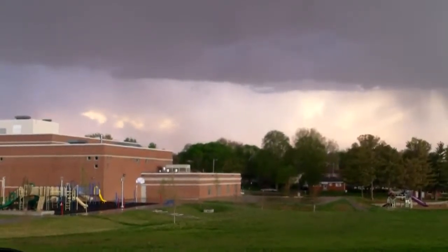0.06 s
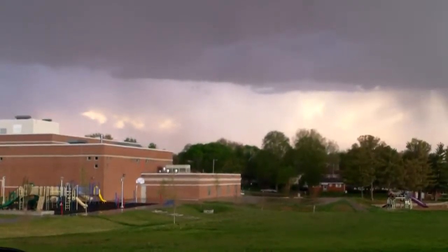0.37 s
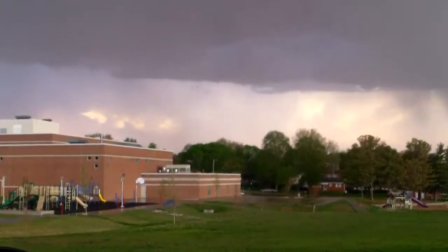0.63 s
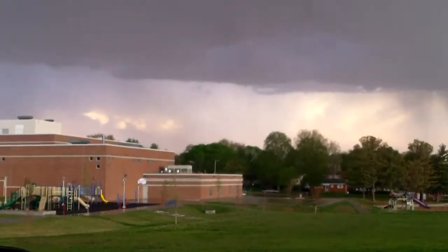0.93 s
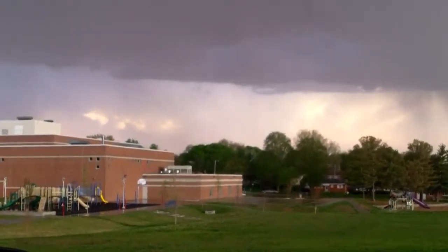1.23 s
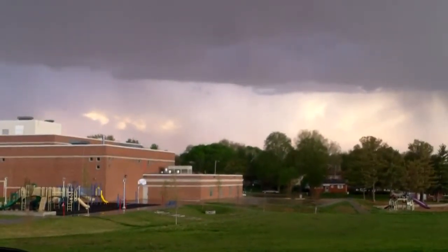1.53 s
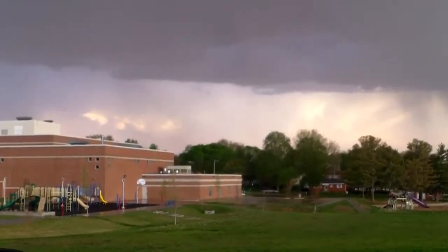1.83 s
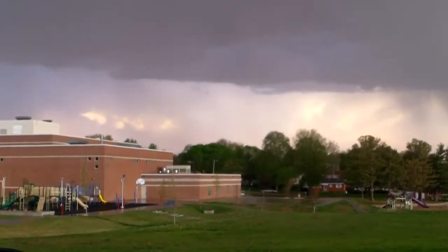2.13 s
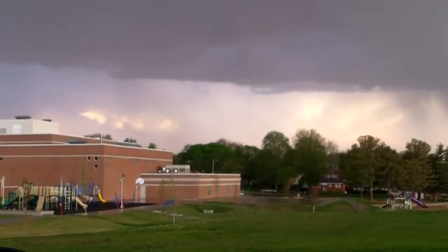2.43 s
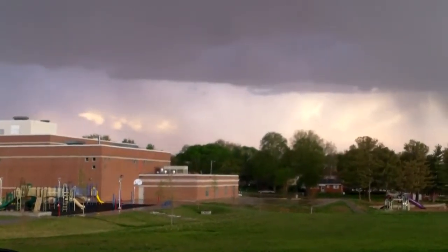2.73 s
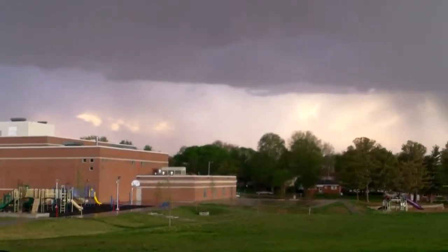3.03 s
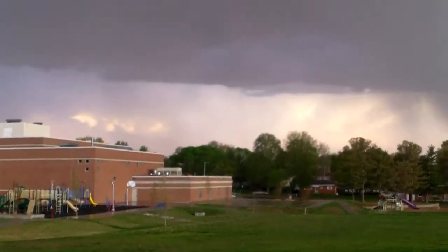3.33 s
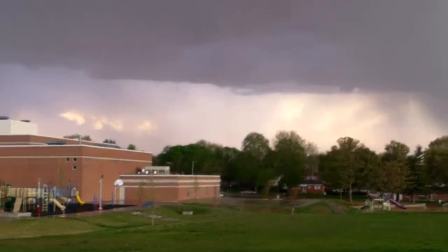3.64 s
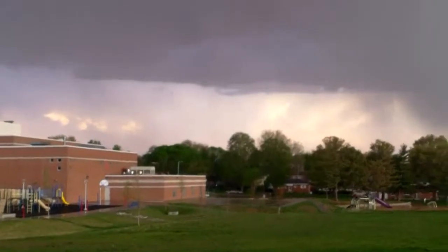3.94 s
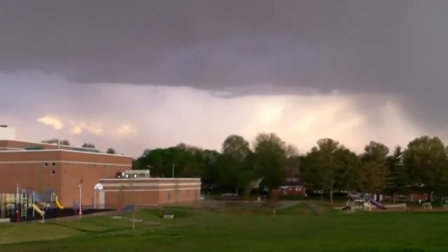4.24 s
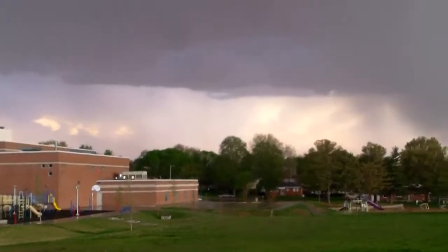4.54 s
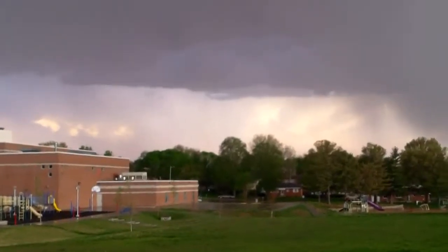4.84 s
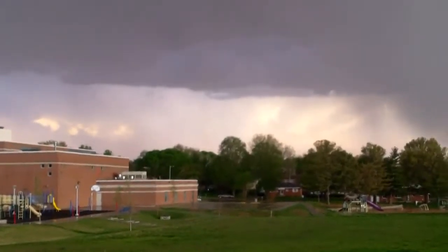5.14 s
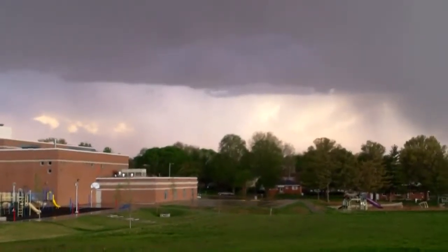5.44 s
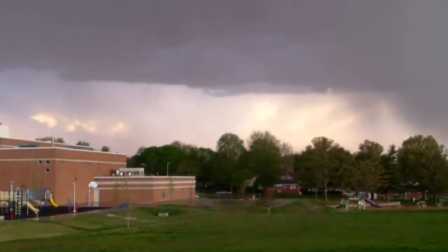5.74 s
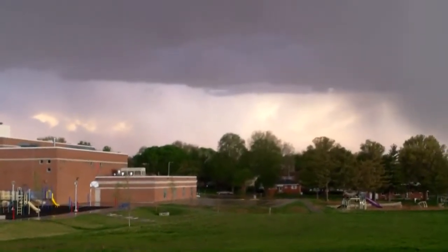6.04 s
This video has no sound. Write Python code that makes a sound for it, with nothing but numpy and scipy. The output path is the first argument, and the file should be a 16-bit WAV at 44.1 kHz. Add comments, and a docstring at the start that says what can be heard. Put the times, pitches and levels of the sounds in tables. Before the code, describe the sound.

Distant thunder rolls and slowly fades over light rain, with scattered drops ticking and splatting on a parked vehicle.

```python
"""Distant thunder, shock waves dulled by the air, rolls over light rain, heard inside a parked vehicle. Almost
at once single peals stand out of the roll, and drops splat on the bodywork or tick close by. Near 1 s the
thunder is heaviest and fine dry crackles fall on its loud peaks; a limiter catches the strongest peals and
ducks the rain for a moment. At 3.6 s comes the hardest tick. Then the roll slowly fades, the rain grows a
little, and a few knocks and soft bumps set the body panels ringing."""
import sys
import numpy as np
from scipy import signal
from scipy.fft import rfft, irfft, next_fast_len
from scipy.io import wavfile
from scipy.ndimage import uniform_filter1d

SR = 44100
rng = np.random.default_rng(int(sys.argv[2]) if len(sys.argv) > 2 else 0)


def persist_wave(psi):
    """Save psi, clipped to +-1, as 16-bit WAV."""
    counts = np.round(np.clip(psi, -1, 1) * 32767).astype(np.int16)
    wavfile.write(sys.argv[1], SR, np.atleast_2d(counts).T)


N = 276948
TIME = np.arange(N) / SR

# slow envelope of the thunder: time_s, level_db, depth_db (more rumble, less growl)
THUNDER_ROLL = [(0, -24, 0.5), (.3, -18, 3.5), (.58, -19.5, 2), (.92, -13, 1), (1.05, -18.5, 3),
                (1.2, -23, -0.5), (1.45, -20, 1.5), (1.95, -19.5, 1), (2.55, -21.5, 1), (2.75, -21, 1),
                (2.9, -18.5, 2.5), (3.1, -21, 1.5), (3.35, -21.5, 2.5), (3.7, -27.5, 1), (4.1, -25, 2),
                (4.4, -27, 3), (4.98, -26.5, 2.5), (5.3, -30, 3.5), (6.0, -31, 4.5), (6.28, -28.5, 1)]
# low, middle and high registers of the thunder: frequency_hz, gain_db
RUMBLE_SPECTRUM = [(5, -5.5), (14, 9), (26, -8.5), (40, 6), (50, 1), (63, -8), (80, -1), (100, -7.5),
                   (135, -44.5)]
BOOM_SPECTRUM = [(70, -17), (105, -3.5), (120, 2.5), (140, 0.5), (180, 0.5), (215, -3.5), (245, -9),
                 (290, -8.5), (420, -32.5)]
GROWL_SPECTRUM = [(190, -21.5), (260, -14.5), (295, 6.5), (335, 4.5), (400, -2.5), (540, -6), (740, -12.5),
                  (830, -12.5), (930, -19.5), (1110, -19), (1300, -38), (2200, -77), (4000, -57)]
# resonances and notches of the cabin: centre_hz, width_hz, gain_db
CABIN_RESONANCES = [(174.7, 15.3, 1), (234, 12, -4), (358, 13.6, -3), (542, 26, 2.5), (661, 16, 2.5),
                    (775, 22, -4), (798, 30, -0.5)]
# nearly steady envelope of the rain: time_s, level_db
RAIN_ENVELOPE = [(0, -47.5), (.3, -49.5), (.75, -47), (1.2, -48), (2, -47.5), (2.5, -47.5), (3.1, -48),
                 (3.7, -49.5), (4.1, -46), (6.28, -45.5)]
# wash of the rain outside: frequency_hz, gain_db
RAIN_SPECTRUM = [(200, -4.5), (700, 10.5), (1300, 8.5), (2200, 4.5), (3500, -1), (6500, -6.5),
                 (10000, -7.5), (12000, -11), (15500, -10)]
# single peals of thunder: centre_s, peak_db, pitch_hz, half_length_s
THUNDER_PEALS = [(0.049, -2, 40, 0.019), (0.211, -20.5, 470, 0.034), (0.276, -3.5, 62, 0.015),
                 (.313, -20.5, 512, 0.067), (.328, -5, 170, 0.021), (.4, -16, 270, 0.039),
                 (.411, -3, 182, .024), (.705, -14, 430, 0.032), (.715, -1.5, 84.5, 0.026),
                 (.795, 0, 183, 0.032), (.887, -0.5, 57, 0.05), (.935, 0, 106, 0.015),
                 (0.967, 3, 30.4, 0.039), (1.009, -1, 74, 0.023), (1.195, -1.5, 60, 0.041),
                 (1.223, -3.5, 30.3, 0.15), (1.612, -13.5, 255, 0.031), (1.79, -14, 193, 0.078),
                 (1.879, -14, 288, 0.066), (1.961, -14, 337, .05), (1.988, -9, 72.7, 0.053),
                 (2.084, -16, 304, 0.063), (2.16, -6, 155, 0.034), (2.39, -11, 100, 0.034),
                 (2.423, -6, 149, 0.034), (2.452, -17.5, 340, .07), (2.494, -9.5, 191, .047),
                 (2.619, -17.5, 312, 0.0206), (2.68, -17.5, 520, 0.021), (2.685, -0.5, 151, 0.024),
                 (2.717, -1, 173, 0.016), (2.84, -11.5, 183, 0.058), (2.909, -10.5, 315, 0.04),
                 (2.916, -25, 537, 0.075), (2.965, -4, 188, 0.0094), (3.015, -5.5, 38.6, 0.041),
                 (3.1, -18, 167, 0.12), (3.24, -25.5, 474, 0.076), (3.257, -9.5, 88, 0.031),
                 (3.38, -12, 114.4, 0.047), (3.913, -16.5, 230, 0.06), (4.135, -17.5, 310, 0.057),
                 (4.14, -14.5, 98, 0.065), (4.17, -21, 191, .12), (4.512, -17.5, 110, 0.14),
                 (4.86, -10, 137.5, 0.0075), (4.961, -13, 117, 0.067), (5.07, -17.5, 123, 0.078),
                 (5.62, -18.5, 116, 0.067)]
# dulling of a peal by distance: frequency_hz, gain_db
AIR_ABSORPTION = [(1000, 0.5), (2500, -16.5)]
# drops bursting on the bodywork: start_s, level_db, low_db, length_factor, top_db
SPLAT_DROPS = [(0.2357, -28.5, -1, 0.38, -5), (0.6592, -35.5, 0, 0.18, 12), (1.081, -35.5, 1, 0.43, 5),
               (1.187, -43, -2, 0.37, -3), (1.403, -41.5, -5, 0.28, 5), (1.464, -45, -4, 0.45, -2),
               (1.6073, -33, 9, 0.32, -1), (1.621, -34, 1, 0.34, 2), (1.771, -40, 1, 0.19, -3),
               (2.331, -36.5, -1, .2, 6), (2.6284, -32, -0.5, 0.43, 4), (2.916, -40, 1, 0.49, 12),
               (2.9331, -32, 0, .36, 8), (3.058, -52, -1.5, 0.38, 5), (3.126, -39.5, -3, 0.25, 2),
               (3.251, -38, 6, 0.41, 12), (3.342, -35.5, 2, 0.38, 7), (3.354, -35.5, -3, 0.39, 7),
               (3.494, -39.5, 1, 0.61, 2), (3.677, -36, 22, 0.15, 3), (3.789, -35.5, -2, 0.39, 2),
               (3.903, -33.5, -3.5, 0.48, 11), (3.9732, -33, -5, 0.44, 1), (4.0228, -38, -6, 0.33, 9),
               (4.0575, -36.5, -4, 0.33, 12), (4.1085, -33, -3.5, 0.48, 5), (4.357, -31.5, -12.5, 0.28, 6),
               (4.3856, -37.5, -1.5, 0.43, 9), (4.7123, -36, 7.5, 0.56, 13), (4.779, -39, 1, 0.47, 4),
               (4.803, -40, 1, 0.38, 8), (4.873, -31, 4, 0.31, 1), (5.073, -35.5, 1, 0.47, 2),
               (5.522, -34, -12, 0.52, 6), (5.5462, -38, 7, 0.43, 5), (5.811, -32, 3, 0.43, 1)]
# colour common to all splats: frequency_hz, gain_db
SPLAT_SPECTRUM = [(200, -15), (700, 7.5), (1500, 4.5), (3000, 0), (6000, -6), (9500, -13.5), (11500, -27.5),
                  (15500, -37)]
# drops on a hard surface close by: start_s, level_db, low_db, top_db, rattle_db, cabin_db, middle_db
TICK_DROPS = [(.319, -36, 6, 14, -12, -24, 0), (.3602, -37.5, -22, 12, -5, -18, -2),
              (.395, -40, -8, 12, -10, -18, 0), (.533, -43, -23, 2, -10, -12, -3),
              (.58, -41, -33, 2, -7, -4, -7), (0.8568, -16.5, 10, -0.5, -6, -19, -11),
              (1.006, -27.5, 6, 5, -2, -10, -2), (1.395, -44.5, -15, 0, -10, -22, -2),
              (1.546, -32, 18, -7, -6, -14, -1), (1.576, -39.5, -9, 5, -9.5, -26, 2),
              (1.882, -46, 11, -20, -10, -18, 0), (1.957, -44, -10, 7, -10, -20, 0),
              (2.089, -46, -12, 7, -7, -14, 0), (2.149, -42, -10, 5, -7, -10, -2),
              (2.3714, -27.5, 19, -9, -19, -16, -2), (2.4165, -37.5, 13, -12, -10, -4, -2),
              (2.848, -36, 17, 2, -6, -9.5, -6), (3.224, -40, 11, 2, -9, -9, 1),
              (3.2895, -43, 20, -10, -10, 0, 0), (3.467, -45, 13, -17, -8, 1, 0),
              (3.6241, -11, 4.5, 1.5, -9, -18, -2.5), (3.966, -33.5, 11, 3, -13, -7, -7),
              (4.2915, -41, 16, -20, -10, -10, 0), (4.3588, -30.5, -11, -11, -6, -7, 10),
              (4.4536, -43.5, -8, 4, -10, -24, 0), (4.608, -42, -8, 7, -10, -18, 0),
              (4.924, -41, -8, 6, -14, -26, 0), (4.9859, -25, 8, 0, -4, -18, -1),
              (5.0265, -42, -15, 14, -10, -22, 0), (5.127, -42, 0, -9, -6, -7, 4),
              (5.2993, -41.5, 19, 5, -10, -8, 6), (5.4125, -24.5, 12, -18, -21, -18, -2),
              (5.61, -41.5, -2, 9, -8, -15, 0), (5.654, -40, 19, 1, -6, -14, 0),
              (5.723, -46, -12, 16, -8, -16, 0), (5.935, -42.5, -6, 0, -5, -18, -8)]
# colour common to all ticks: frequency_hz, gain_db
TICK_SPECTRUM = [(400, -43), (1600, -5), (2250, 0.5), (2700, 3.5), (3400, 7.5), (4750, 10), (5500, 7),
                 (7000, 7.5), (8100, 4), (9200, 9), (11000, 0.5), (12400, 0), (13800, -4), (15000, -6.5)]
# fine clicks during the heaviest thunder: start_s, strength_db
CRACKLE_CLICKS = [(0.4146, -20), (.691, -22), (0.7132, -17.5), (0.7969, -19), (.8855, -28), (0.9, -15.5),
                  (.922, -14), (.9335, -16), (0.94, -25), (0.9464, -25.5), (0.967, -15), (0.986, -20),
                  (0.997, -35), (1.0273, -20), (1.038, -25), (1.049, -22), (1.718, -32), (1.872, -24.5),
                  (2.1728, -23.5), (2.682, -17.5), (2.714, -21.5), (2.967, -34), (3.014, -21)]
# colour of those clicks: frequency_hz, gain_db
CRACKLE_SPECTRUM = [(300, 45), (1500, 12.5), (4000, 2.5), (9000, -7), (15500, -5)]
# knocks and soft bumps on the body panels: start_s, level_db, softness_db_per_octave, length_factor
PANEL_BLOWS = [(3.680, -50, 5, 0.45), (4.721, -36, 19, 1.6), (4.881, -35, 11, 5.5), (5.55, -28.5, 1, .4),
               (5.819, -25, 9, 1.1), (6.154, -22, 35, 3.4)]
# modes of a panel, before each blow scales them: frequency_hz, level_db, t60_s
PANEL_MODES = [(292, -11, 0.019), (514, 4.5, 0.05), (698, -1.5, 0.094), (1060, 6, 0.026),
               (1500, -33, 0.021), (1730, -12, 0.017)]
# resonances and a notch of the microphone port: centre_hz, width_hz, gain_db
PORT_RESONANCES = [(4740, 250, 0), (6440, 150, 1), (6600, 1160, 5), (8010, 330, -4.5), (8950, 1100, 4)]


def amp(db):
    """Decibels to amplitude ratio."""
    return 10 ** (np.asarray(db) / 20)


def unit_rms(x):
    """Normalisation to an rms of 1."""
    return x / np.sqrt(np.mean(x ** 2) + 1e-20)


def gain_at(spectrum, hz):
    """Linear interpolation of a gain in dB over log frequency."""
    frequency_hz, gain_db = np.transpose(spectrum)
    return np.interp(np.log(hz + 1), np.log(frequency_hz), gain_db)


def coloured(x, db_at):
    """Minimum-phase filtering with gain db_at(hz): folding the cepstrum makes the response causal."""
    size = 2 * next_fast_len(len(x))
    gain = amp(db_at(np.fft.rfftfreq(size, 1 / SR)))
    cepstrum = irfft(np.log(gain), size)
    cepstrum[1:size // 2] *= 2
    cepstrum[size // 2 + 1:] = 0
    return irfft(rfft(x, size) * np.exp(rfft(cepstrum)), size)[:len(x)]


def local_rms(x, window_s):
    """Running rms under a triangular window."""
    size = max(int(window_s * SR), 1)
    power = uniform_filter1d(uniform_filter1d(x ** 2, size), size)
    return np.sqrt(abs(power) + 1e-14)


def impacts(per_s, spread_db):
    """A Poisson process: impulses at random moments, most small and a few large."""
    size = amp(spread_db * np.minimum(rng.exponential(1, N), 4))
    return size * rng.choice([-1, 1], N) * (rng.random(N) < per_s / SR)


def shock_waves(spectrum, level_db, per_s, spread_db, steady_s):
    """Superposition: shocks from many bends of the lightning channel, dulled by distance, form a roll."""
    top_hz, top_db = spectrum[-1]
    absorbed = list(spectrum) + [(2 * top_hz, top_db - 39.5)]  # the air absorbs everything higher
    waves = coloured(impacts(per_s, spread_db), lambda hz: gain_at(absorbed, hz))
    return waves / local_rms(waves, steady_s) * amp(level_db)


def thunder():
    """Amplitude modulation: one roll drives three registers, and its depth trades growl for rumble."""
    time_s, level_db, depth_db = np.transpose(THUNDER_ROLL)
    level, depth = np.interp(TIME, time_s, level_db), np.interp(TIME, time_s, depth_db)
    rumble = shock_waves(RUMBLE_SPECTRUM, level + depth, per_s=330, spread_db=3.0, steady_s=0.42)
    boom = shock_waves(BOOM_SPECTRUM, level, per_s=280, spread_db=0.0, steady_s=0.097)
    growl = shock_waves(GROWL_SPECTRUM, level - depth, per_s=800, spread_db=1.5, steady_s=0.42)
    return amp(3.0) * rumble + amp(-0.03) * boom + amp(-4.0) * growl


def cavity(x, resonances):
    """Resonance: an enclosed air space imposes bell-shaped peaks and notches on the spectrum."""
    return coloured(x, lambda hz: sum(gain_db * np.exp(-((hz - centre_hz) / width_hz) ** 2)
                                      for centre_hz, width_hz, gain_db in resonances))


def rain():
    """Shot noise: countless far drops blend into hiss, nearer ones patter, fine droplets prick on top."""
    t = np.arange(SR // 20) / SR
    spray = rng.standard_normal(len(t)) * (np.exp(-t / 0.0045) + 0.18 * np.exp(-t / 0.0023))
    patter = signal.oaconvolve(impacts(per_s=90, spread_db=2), spray)[:N]
    prick = np.diff(rng.standard_normal(len(t)) * np.exp(-t / 0.0005))
    droplets = signal.oaconvolve(impacts(per_s=60, spread_db=2), prick)[:N]
    hiss = rng.standard_normal(N)
    drops = hiss + amp(-5) * unit_rms(patter) + amp(-8) * unit_rms(droplets)
    wash = coloured(drops, lambda hz: gain_at(RAIN_SPECTRUM, hz))
    return unit_rms(wash) * amp(np.interp(TIME, *np.transpose(RAIN_ENVELOPE)))


def peals(slope_db_per_octave=22):
    """Wave packets: shock waves that arrive in a bunch make a brief swell around one pitch."""
    out, t = np.zeros(N), np.arange(-SR // 2, SR // 2) / SR
    for centre_s, peak_db, pitch_hz, half_length_s in THUNDER_PEALS:
        def band_db(hz):
            octaves_away = abs(np.log2((hz + 1) / pitch_hz))
            return gain_at(AIR_ABSORPTION, hz) - np.minimum(slope_db_per_octave * octaves_away, 100)
        waves = coloured(rng.standard_normal(len(t)), band_db)
        swell = waves / local_rms(waves, 2 / pitch_hz) * np.exp(-2 * (t / half_length_s) ** 2)
        out += np.interp(TIME - centre_s, t, amp(peak_db) * swell / abs(swell).max())
    return out


def add(mix, start_s, sound):
    """Superposition of a sound on the mix from start_s on."""
    part = mix[max(round(start_s * SR), 0):][:len(sound)]
    part += sound[:len(part)]


def drop(blow, spectrum, level_db, low_db, top_db, middle_db=0):
    """Source and filter: heavy drops are fuller below, fine ones brighter, some hollow in the middle."""
    tilt = [(2300, low_db), (3300, low_db / 2 + middle_db), (4000, low_db / 4 + middle_db),
            (4800, 0), (7500, 0), (12000, top_db)]
    sound = coloured(blow, lambda hz: gain_at(spectrum, hz) + gain_at(tilt, hz))
    return amp(level_db) * sound / local_rms(sound, window_s=.002).max()


def splats():
    """Splashing: a drop spreads for a few milliseconds and breaks into droplets; its spray dies away."""
    out, t = np.zeros(N), np.arange(SR // 7) / SR
    for start_s, level_db, low_db, length_factor, top_db in SPLAT_DROPS:
        age = t / max(length_factor, .2)
        spread = (1 - np.exp(-age / 0.0081)) * np.exp(-age / 0.034)
        spray = rng.standard_normal(len(t))
        flicker_db = 2.5 * unit_rms(uniform_filter1d(rng.standard_normal(len(t)), size=30))
        blow = spread * spray * amp(flicker_db)
        add(out, start_s, drop(blow, SPLAT_SPECTRUM, level_db, low_db, top_db))
    return out


def ticks():
    """Direct sound and reverberation: a hard crack, a rattle of close reflections, the cabin's decay."""
    out, t = np.zeros(N), np.arange(SR // 10) / SR
    for start_s, level_db, low_db, top_db, rattle_db, cabin_db, middle_db in TICK_DROPS:
        echoes = amp(rattle_db) * np.exp(-t / 0.0017) + amp(cabin_db) * np.exp(-t / 0.011)
        blow = rng.standard_normal(len(t)) * echoes
        blow[0] += 4  # the direct crack
        add(out, start_s, drop(blow, TICK_SPECTRUM, level_db, low_db, top_db, middle_db))
    return out


def crackles():
    """Broadband transients: tiny dry impulses with no ring, each frayed by a trace of noise."""
    out, t = np.zeros(N), np.arange(SR // 200) / SR
    for start_s, strength_db in CRACKLE_CLICKS:
        click = 0.08 * rng.standard_normal(len(t)) * np.exp(-t / 0.00043)
        click[0] += 1
        add(out, start_s, amp(strength_db) * click)
    return coloured(out, lambda hz: gain_at(CRACKLE_SPECTRUM, hz))


def knocks():
    """Damped modal vibration: a blow sets a panel ringing; a soft one excites only its low modes."""
    out, t = np.zeros(N), np.arange(SR // 6) / SR
    lowest_hz = PANEL_MODES[0][0]
    for start_s, level_db, softness_db_per_octave, length_factor in PANEL_BLOWS:
        age = t / max(length_factor, .2)
        ring = np.zeros(len(t))
        for hz, mode_db, t60_s in PANEL_MODES:
            struck_db = mode_db - softness_db_per_octave * np.log2(hz / lowest_hz)
            cycles = hz * rng.uniform(.98, 1.02) * t + rng.random()
            ring += amp(struck_db - 60 * age / t60_s) * np.sin(2 * np.pi * cycles)
        ring *= 1 - np.exp(-age / 0.00098)  # rounded attack
        add(out, start_s, amp(level_db) * ring / local_rms(ring, window_s=.002).max())
    return out


def scene():
    """Superposition: thunder through the cabin, rain, drops and knocks at one microphone, with fine crackles
    laid over them."""
    cabin_thunder = cavity(thunder() + peals(), CABIN_RESONANCES)
    return (cabin_thunder + crackles() + rain() + ticks() + splats() + knocks())[None]


def limiter(x, threshold_db, share, recover_db_per_s):
    """Automatic gain control: the gain falls at once by a share of a peak's excess, then creeps back."""
    sensed = uniform_filter1d(uniform_filter1d(x, size=24), size=24)  # the briefest clicks slip through
    duck_db = share * np.maximum(20 * np.log10(abs(sensed) + 1e-9) - threshold_db, 0)
    recovery_db = recover_db_per_s * TIME
    return x / amp(np.maximum.accumulate(duck_db + recovery_db) - recovery_db)


def record(dry):
    """Port resonance colours the sound; slow and quick limiting, clipping and a low-pass confine it."""
    heard = cavity(dry[0], PORT_RESONANCES)
    ducked = limiter(heard, threshold_db=-7.5, share=0.85, recover_db_per_s=21.5)  # ducks the rain
    held = limiter(ducked, threshold_db=-5.3, share=1, recover_db_per_s=200)  # holds the peaks
    clipped = np.clip(held, -.75, .75)  # flattens the hardest click
    low_pass = signal.firwin(401, cutoff=15480, window=("kaiser", 9), fs=SR)
    return signal.oaconvolve(clipped, low_pass, "same")[None]


dry = scene()
out = record(dry)
persist_wave(out)
```